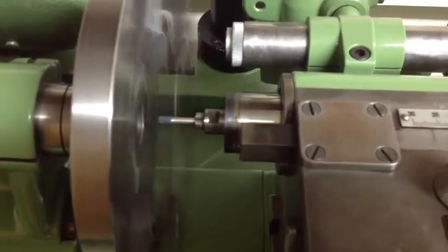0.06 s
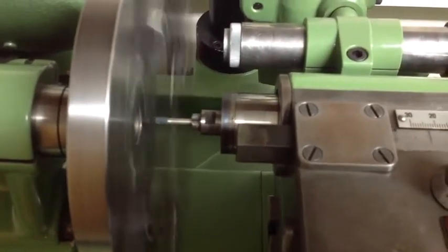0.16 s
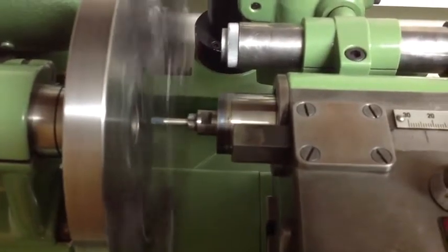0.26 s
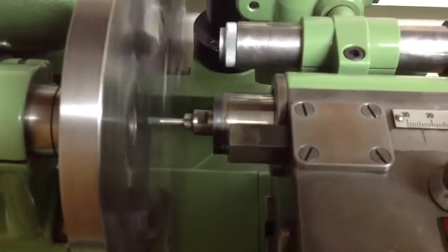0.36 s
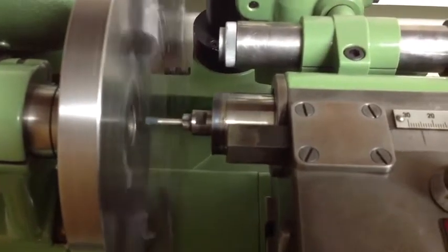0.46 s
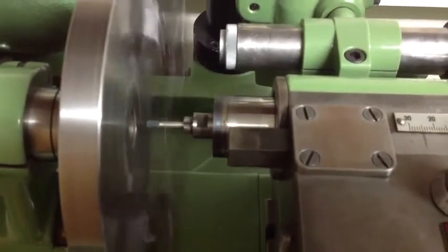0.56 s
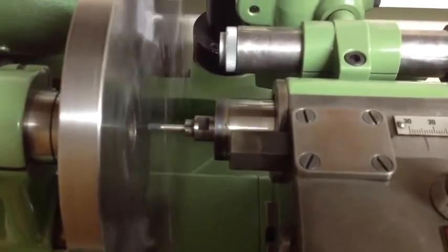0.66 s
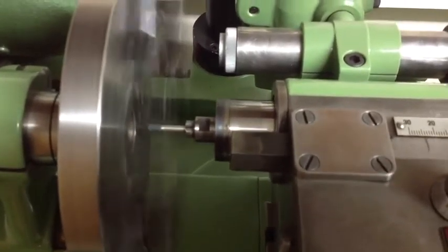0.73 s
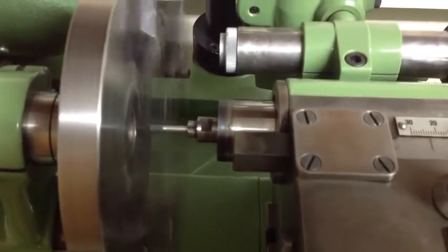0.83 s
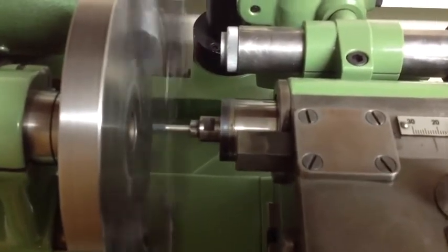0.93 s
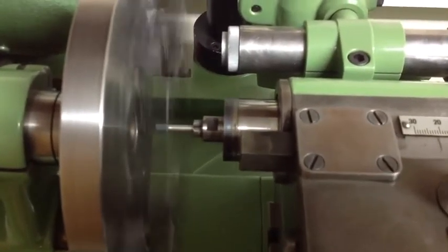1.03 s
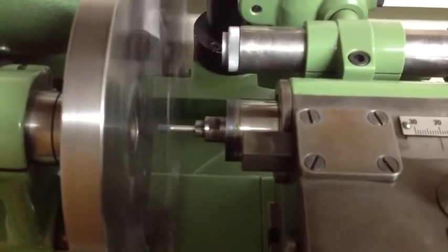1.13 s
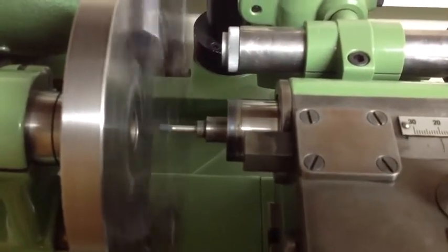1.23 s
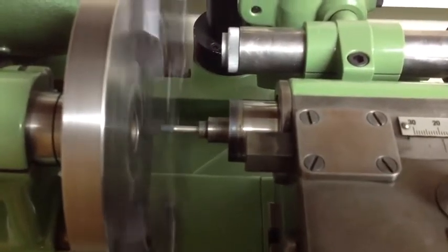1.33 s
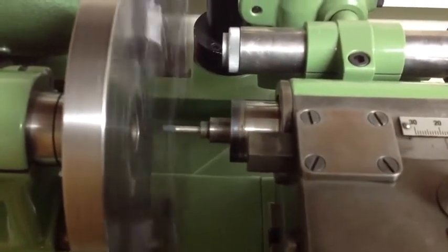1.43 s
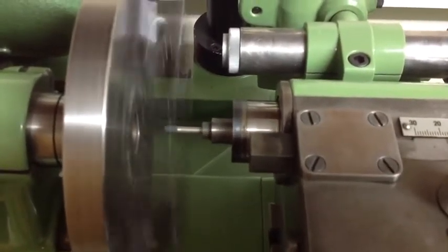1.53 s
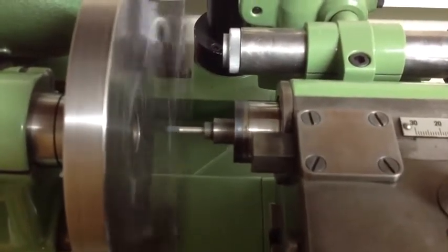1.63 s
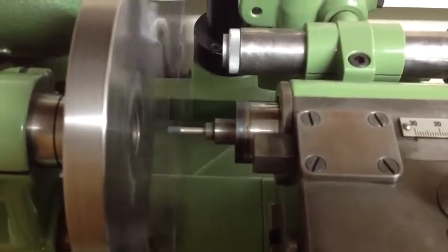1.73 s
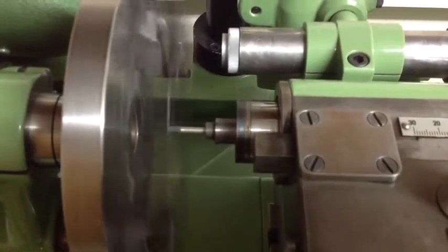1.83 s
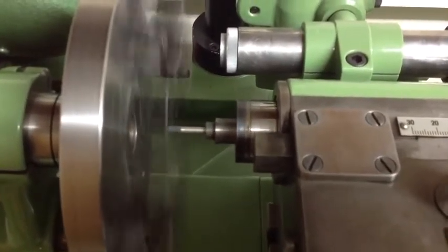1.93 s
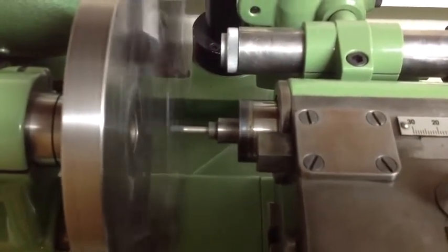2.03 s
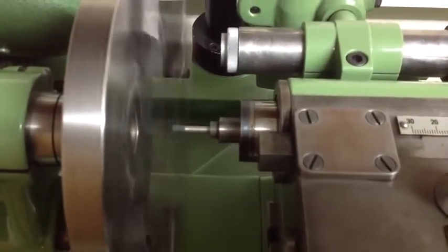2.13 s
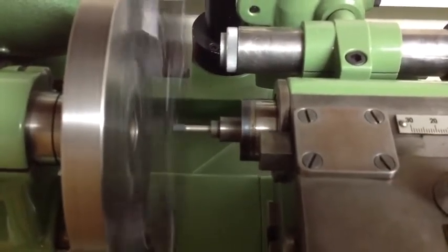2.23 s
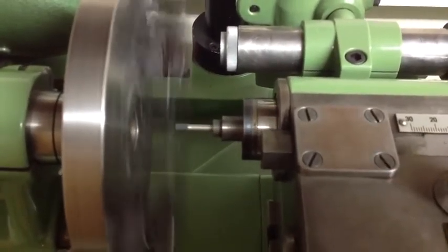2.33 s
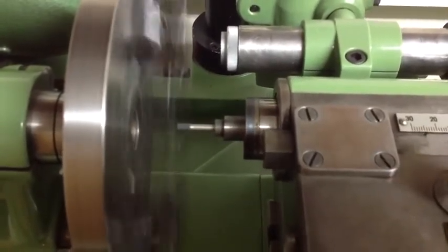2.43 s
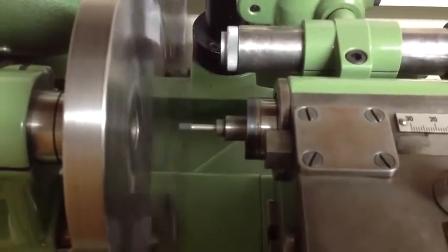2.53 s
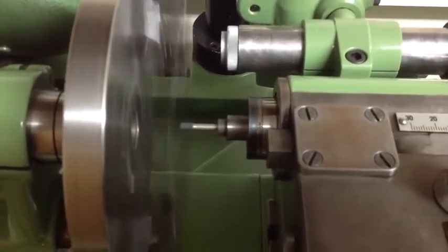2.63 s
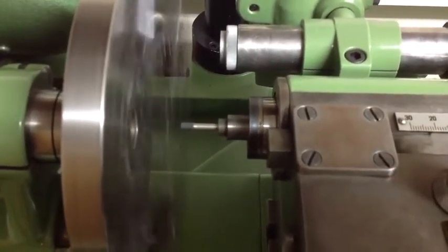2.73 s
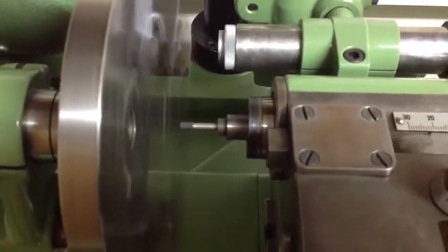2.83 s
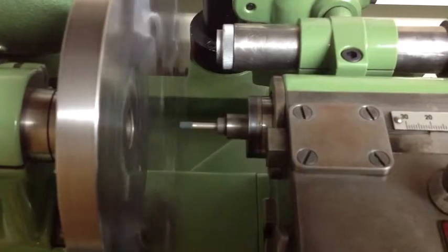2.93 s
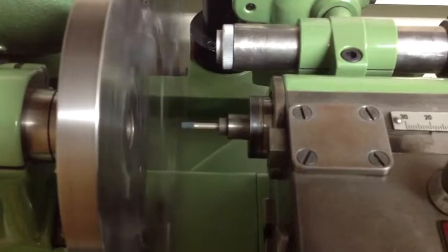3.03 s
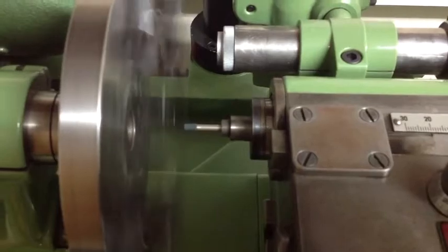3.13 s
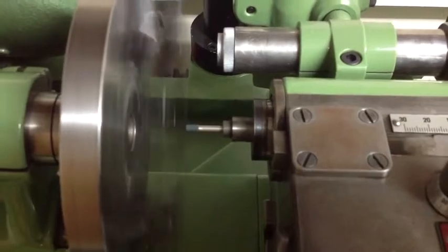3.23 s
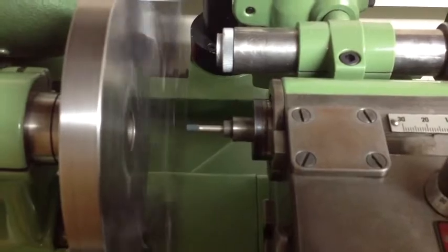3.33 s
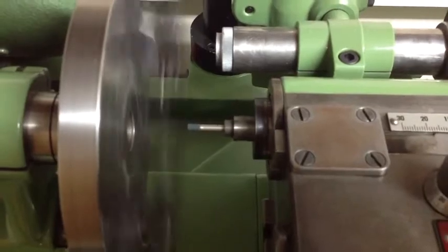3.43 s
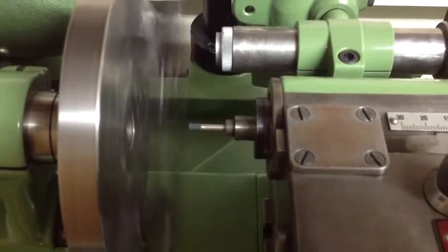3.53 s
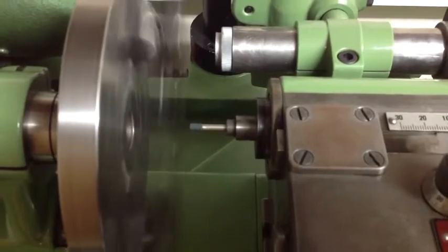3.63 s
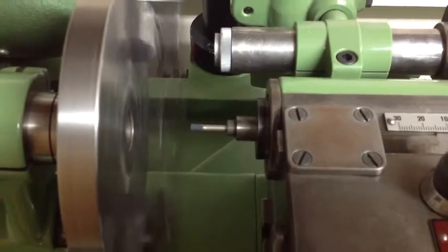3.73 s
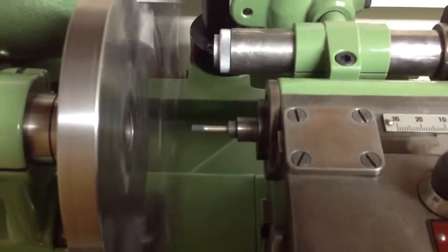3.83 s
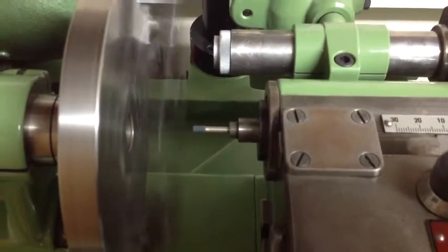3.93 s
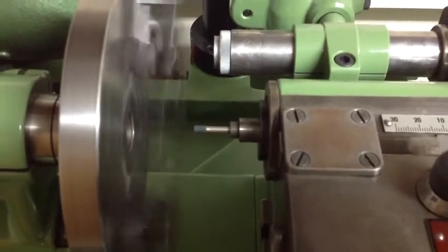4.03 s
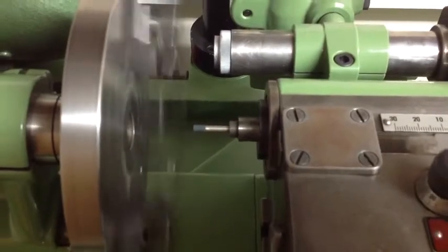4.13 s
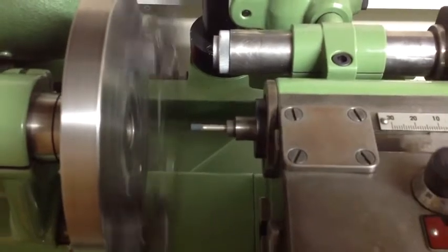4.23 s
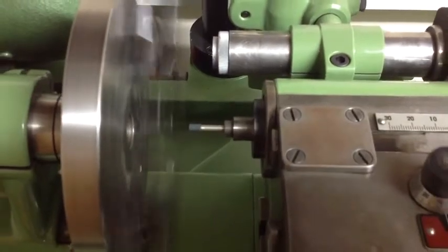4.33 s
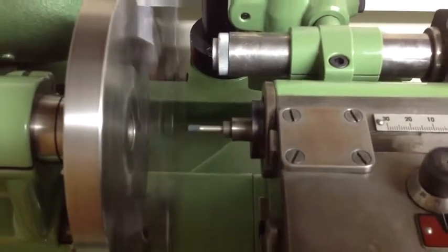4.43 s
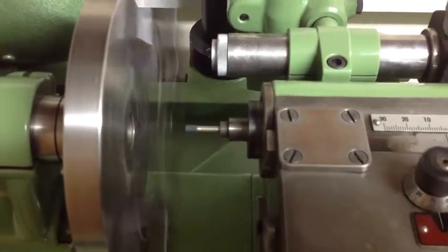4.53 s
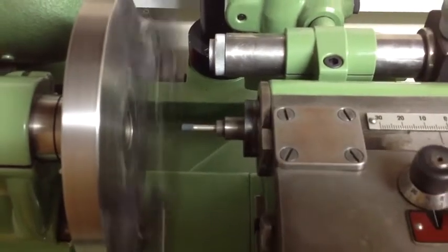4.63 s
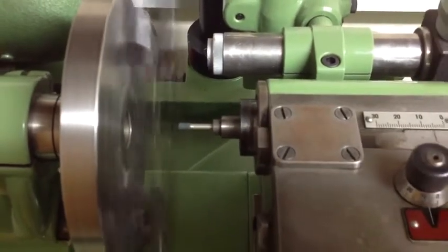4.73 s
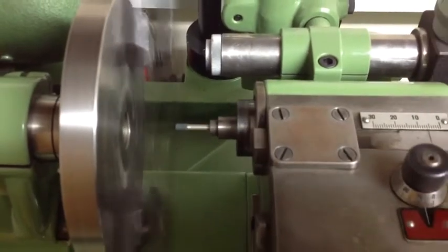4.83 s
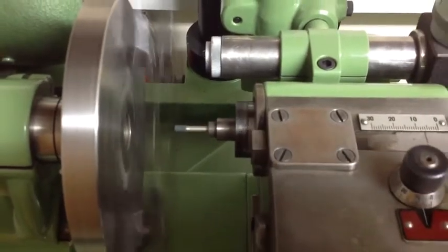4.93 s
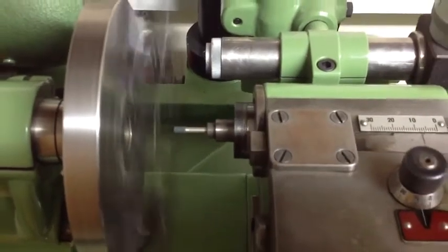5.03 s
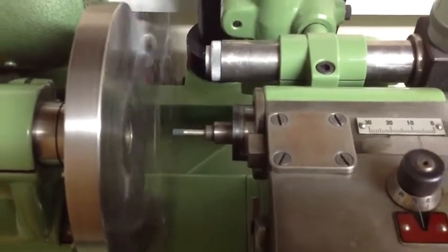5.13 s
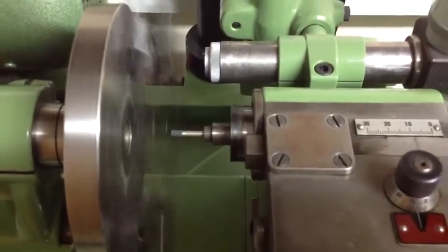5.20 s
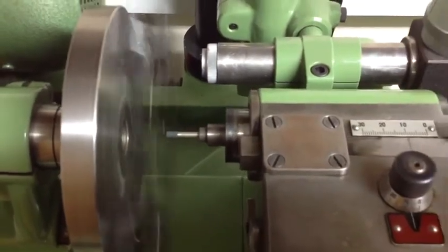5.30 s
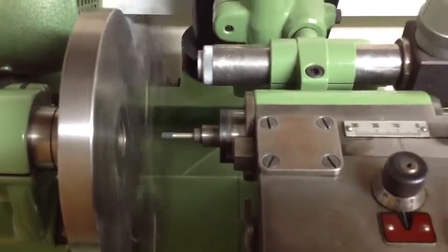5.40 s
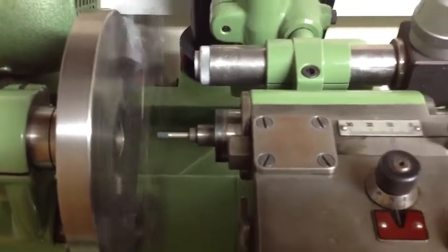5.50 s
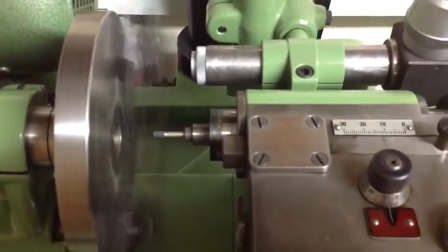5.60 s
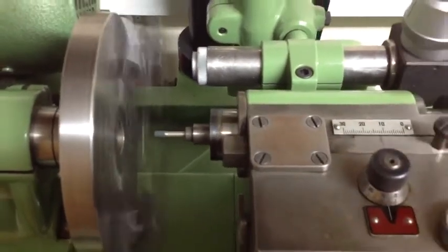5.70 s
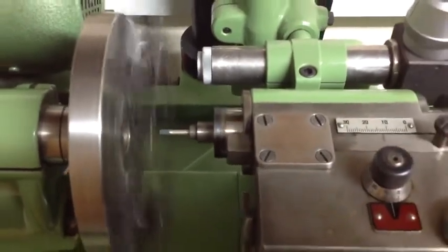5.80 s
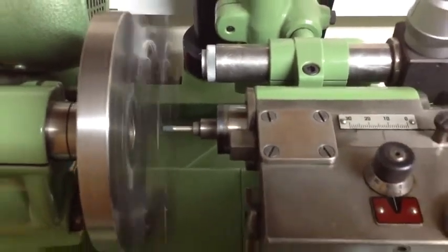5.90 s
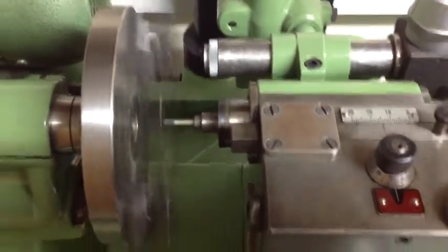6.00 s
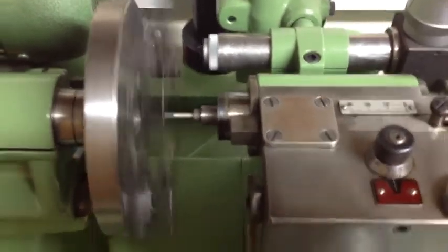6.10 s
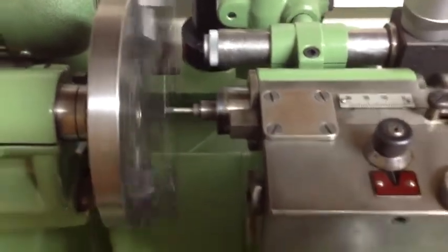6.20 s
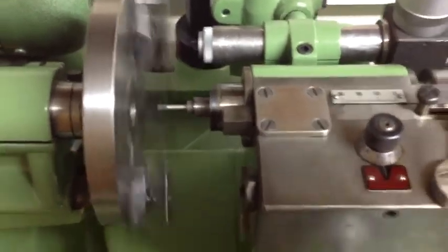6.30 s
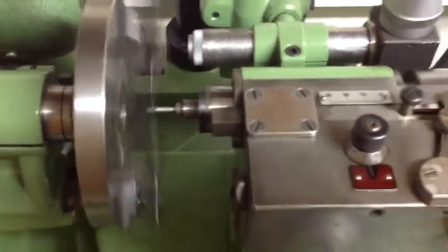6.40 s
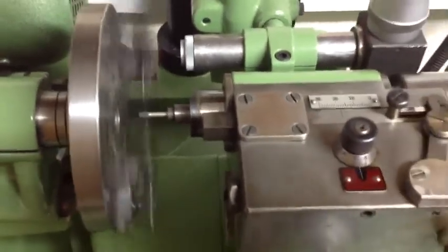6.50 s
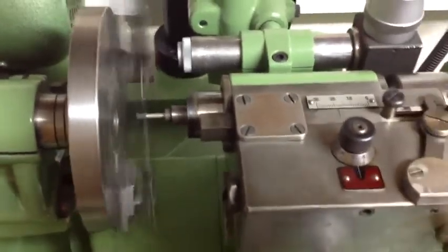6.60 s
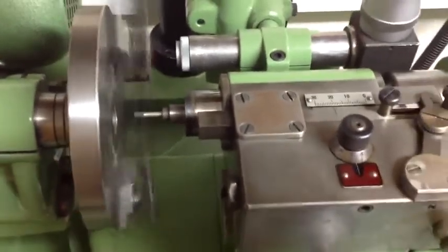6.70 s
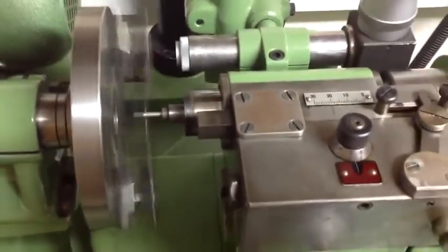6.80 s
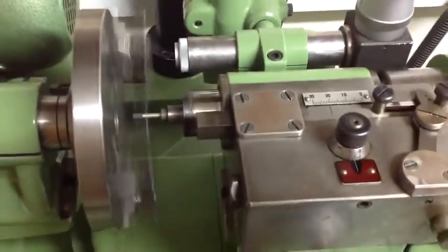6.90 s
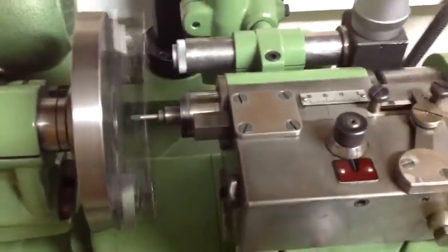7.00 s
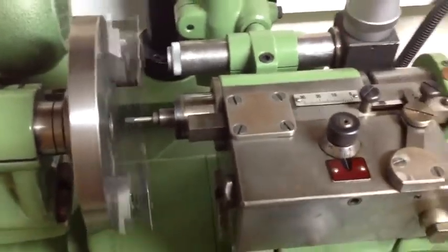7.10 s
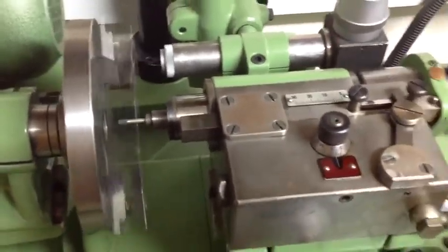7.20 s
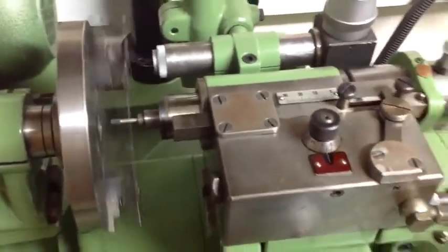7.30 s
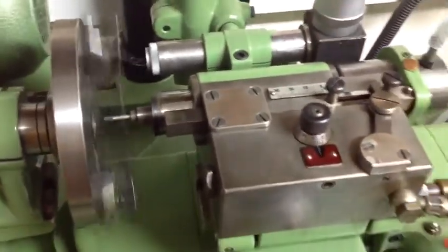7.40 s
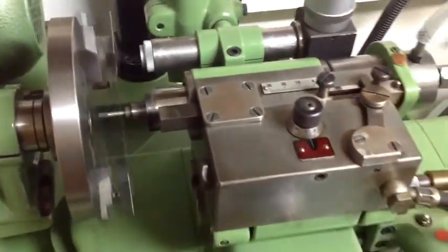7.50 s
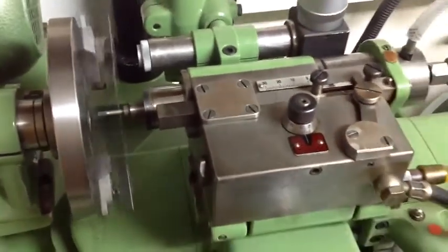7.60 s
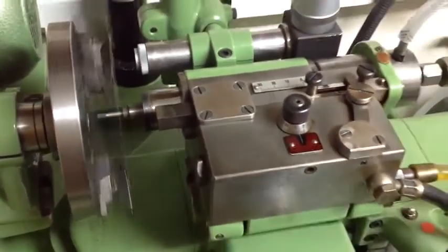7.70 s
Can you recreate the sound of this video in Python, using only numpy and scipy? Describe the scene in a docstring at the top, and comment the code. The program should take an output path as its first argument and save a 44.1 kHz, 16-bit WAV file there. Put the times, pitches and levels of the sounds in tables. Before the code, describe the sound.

A low workshop drive hum and a soft dull metal ring open the sound. Bright purge air soon hisses on, then a grinding spindle starts with a short rattle and fast rising whistles. The hiss briefly ducks as the shrill whine sweeps out of hearing; lower shaft and bearing tones keep climbing, ever more slowly. Close, mono, with a hard-limited top end.

```python
"""A humming workshop, close to a high-speed grinding spindle that starts up.
Purge air (shaped noise) hisses through the housing; then the motor runs up to about 1300 turns a second.
Shaft and bearing tones are sines locked to the speed; they swell as they climb through resonances.
The motor's slot whine sweeps above the recorder's band; up to 22 kHz it can still push the limiter,
which ducks all the sound, hiss included."""
import sys
import numpy as np
from scipy import signal
from scipy.fft import rfft, irfft
from scipy.io import wavfile
from scipy.ndimage import uniform_filter1d

SR = 44100
rng = np.random.default_rng(int(sys.argv[2]) if len(sys.argv) > 2 else 0)


def file_out(sig):
    """Save sig as 16-bit WAV at sys.argv[1]."""
    # one column per channel
    cols = np.atleast_2d(sig).T
    # limit, then scale
    lim = np.clip(cols, -1, 1)
    pcm = np.round(lim * 32767).astype(np.int16)
    wavfile.write(sys.argv[1], SR, pcm)


N = 341775
TIME_S = np.arange(N) / SR
BINS_HZ = np.fft.rfftfreq(N, 1 / SR)
TICKS_S = np.linspace(0, N / SR, 4096)  # slow control clock


def gain_of(db):
    """Decibels to amplitude."""
    return np.exp(np.asarray(db) * (np.log(10) / 20))


def evened(x):
    """Scales to an rms of one."""
    return x / np.sqrt(np.mean(x ** 2) + 1e-20)


def sampled(control):
    """Spreads a slow control over all samples."""
    return np.interp(TIME_S, TICKS_S, control)


def wander(rate_hz):
    """Smooth random control of unit rms; its changes roll off above rate_hz."""
    hz = np.fft.rfftfreq(len(TICKS_S), TICKS_S[1])
    smooth = rfft(rng.standard_normal(len(TICKS_S))) / (1 + (hz / rate_hz) ** 2)
    return evened(irfft(smooth))


def swell(middle_s, length_s):
    """A bell-shaped rise and fall around middle_s."""
    return 1 / np.sqrt(1 + (2 * (TICKS_S - middle_s) / length_s) ** 4)


def spectrum_db(points):
    """Joins (Hz, dB) points on a log-frequency axis."""
    hz, db = np.transpose(points)
    return np.interp(np.log(BINS_HZ + 1), np.log(hz + 1), db)


def noise(db):
    """Random noise with the given spectrum shape, at unit rms."""
    white = rfft(rng.standard_normal(N))
    return evened(irfft(white * gain_of(db), N))


def lift_db(resonances):
    """Lift of (Hz, width Hz, height dB) resonances at every frequency; their powers add."""
    power = 1
    for hz, width_hz, height_db in np.abs(resonances):
        offset = 2 * (BINS_HZ - hz) / width_hz
        power = power + (gain_of(height_db) ** 2 - 1) / (1 + offset ** 2) ** 2
    return 10 * np.log10(power)


# Housing resonances. Each row: centre in Hz, width in Hz, full height in dB.
HOUSING_MODES = [(854, 91, 17), (1150, 96, 11), (1840, 250, 13.5), (2530, 26, 2.5), (3090, 179, 13),
                 (4193, 37, 13.5), (4488, 215, 12.5), (5634, 190, 11), (6460, 60, 4.5), (6520, 100, 8.5),
                 (8056, 290, 9), (8490, 250, 5.5), (9190, 95, 8.5), (11480, 440, 5.5), (12130, 130, 10),
                 (14560, 200, 10)]


def housing_lift_db():
    """Lift by the housing's resonances at every frequency."""
    return lift_db(HOUSING_MODES)


# Straight climb until EASE_S, then an exponential approach to TOP_HZ.
MOTOR_ON_S, EASE_S, CLIMB_HZ_PER_S, TOP_HZ, SETTLE_S = 1.252, 2.361, 423.7, 1393.4, 2.429


def shaft_hz():
    """Turns a second: full torque first, then the shaft closes in on its top speed."""
    climb_hz = CLIMB_HZ_PER_S * (np.clip(TICKS_S, MOTOR_ON_S, EASE_S) - MOTOR_ON_S)
    shortfall = np.exp(-np.maximum(TICKS_S - EASE_S, 0) / SETTLE_S)
    return TOP_HZ - (TOP_HZ - climb_hz) * shortfall


def growth_db(db_per_doubling):
    """Vibration grows with speed; 0 dB at top speed."""
    return db_per_doubling * np.log2(shaft_hz() / TOP_HZ + 1e-6)


def passing_db(multiple, response_db):
    """Reads a response at the gliding pitch of one multiple of the shaft speed."""
    return np.interp(multiple * shaft_hz(), BINS_HZ, response_db)


def fading_db(depth_db, rate_hz):
    """A gliding tone fades in and out at random among the room's standing waves."""
    return 20 * np.log10(evened(gain_of(depth_db * wander(rate_hz))))


def tone(multiple, db, flutter_db, smear_rad, rate_hz, lowest_hz=100):
    """A sine locked to the shaft; its strength flutters and its phase wavers."""
    hz = multiple * shaft_hz()
    turns = (np.cumsum(hz) - hz / 2) * TICKS_S[1]
    angle = 2 * np.pi * turns + smear_rad * wander(rate_hz)
    radiated = (hz ** 2 / (hz ** 2 + lowest_hz ** 2)) ** 2  # a small body radiates low tones poorly
    in_band = np.clip((SR / 2 - hz) / 1000, 0, 1)  # no aliasing
    flutter = evened(gain_of(flutter_db * wander(rate_hz)))
    size = np.sqrt(2) * gain_of(db) * flutter * radiated * in_band
    return sampled(size) * np.sin(sampled(angle))


# Workshop noise spectrum. Each row: frequency in Hz, relative level in dB per Hz.
SHOP_SPECTRUM = [(30, -42), (75, -33), (110, -17), (170, -11.5), (240, -5.5), (350, -7.5), (550, -14),
                 (850, -6.5), (1150, -2.5), (1600, -6.5), (2300, -4), (2900, -12), (9000, -10), (15000, -9)]
# Ringing bands in the background. Each row: centre in Hz, width in Hz, height in dB.
SHOP_RINGING = [(634, 133, 12.5), (2200, 150, 5), (3420, 110, 15.5), (4170, 110, 8), (5290, 180, 14),
                (10300, 350, 4), (14400, 150, 9)]
# Hum of the work drive. Each row: frequency in Hz, mean rms level in dB.
DRIVE_HUM = [(121, -75.5), (219.5, -60), (438.7, -59), (543, -58), (561, -62.5), (658, -60)]


def workshop(noise_db=-39.5):
    """Steady machine noise, and the work drive's hum as sines wavering in level and phase."""
    noise_size = gain_of(noise_db + 1.7 * wander(2.5))
    out = sampled(noise_size) * noise(spectrum_db(SHOP_SPECTRUM) + lift_db(SHOP_RINGING))
    for hz, db in DRIVE_HUM:
        angle = 2 * np.pi * hz * TICKS_S + hz / 1100 * wander(7.5)
        size = np.sqrt(2) * gain_of(db + 2.32 * wander(3.3))
        out += sampled(size) * np.sin(sampled(angle))
    return out


# Dull ring. One row: start in seconds, peak rms level in dB, centre in Hz, rise and fall time in seconds.
DULL_RING = (0, -50, 1300, 0.3)


def dull_ring():
    """A soft, dull ring of metal: a narrow band of noise that rises and falls once."""
    start_s, peak_db, hz, rise_s = DULL_RING
    ring = noise(-20 * np.log10(1 + ((BINS_HZ - hz) / 250) ** 2))
    age = np.maximum(TICKS_S - start_s, 0) / rise_s
    return gain_of(peak_db) * ring * sampled(age * np.exp(1 - age))


def ripple_db(depth_db, spacing_hz):
    """Fine uneven colour of the hiss: random narrow peaks and gaps across the spectrum."""
    steps_hz = np.cumsum(np.full(1024, spacing_hz))
    return depth_db * np.interp(BINS_HZ, steps_hz, rng.standard_normal(len(steps_hz)))


# Air jet alone. Each row: frequency in Hz, relative level in dB per Hz.
JET_SPECTRUM = [(150, -43), (400, -25.5), (700, -19), (1100, -12.5), (1500, -21.5), (2100, -11.5),
                (2800, -7), (4300, -6), (5000, -3), (7200, -4.5), (8200, -0.5), (10200, -1), (11500, 0),
                (15500, 0.5)]
# Rush of the turning spindle. Each row: frequency in Hz, relative level in dB per Hz.
RUSH_SPECTRUM = [(150, -36), (550, -25), (820, -7), (1100, -9), (1520, -13), (1950, -7), (2650, -10.5),
                 (3300, -2.5), (4300, -1.5), (6400, 0.5), (7300, -1.5), (8300, 0.5), (11500, 2), (15500, 2)]
VALVE_S, PRESSURE_RISE_S, HISS_DB, SAG_AT_TOP_DB = 0.39, 0.49, -15, -2


def air(rush_share=0.67, rush_resonant=0.52, flicker_db=0.5, surge_db=1.6, surge_s=1.65, surge_length_s=0.68):
    """The jet rings the housing and surges as the shaft starts; with speed a smoother rush takes over."""
    lift, ripple = housing_lift_db(), ripple_db(depth_db=2.52, spacing_hz=44.65)
    jet = noise(spectrum_db(JET_SPECTRUM) + lift + ripple)
    rush = noise(spectrum_db(RUSH_SPECTRUM) + rush_resonant * lift + ripple)
    share = np.clip(rush_share * shaft_hz() / 1000, .01, .99)  # of the power
    pressure = 1 - np.exp(-np.maximum(TICKS_S - VALVE_S, 0) / PRESSURE_RISE_S)
    sag_db = SAG_AT_TOP_DB * shaft_hz() / TOP_HZ
    surge = surge_db * swell(surge_s, surge_length_s)
    size = pressure * gain_of(HISS_DB + sag_db + surge + flicker_db * wander(7.7))
    return sampled(size * np.sqrt(1 - share)) * jet + sampled(size * np.sqrt(share)) * rush


def rattle(peak_db=-34, middle_s=1.61, length_s=0.42, centre_hz=1050, width_hz=800, resonant=1.16):
    """While the shaft is still slow, the rolling balls rattle the housing's low resonances."""
    band_db = -20 * np.log10(1 + ((BINS_HZ - centre_hz) / width_hz) ** 2)
    low_cut_db = -10 * np.log10(1 + (600 / (BINS_HZ + 1)) ** 6)
    size = gain_of(peak_db) * swell(middle_s, length_s)
    return sampled(size) * noise(band_db + low_cut_db + resonant * housing_lift_db())


# Early housing rings. Each row: middle in seconds, pitch in Hz, level in dB, length in seconds.
EARLY_RINGS = [(1.54, 2600, -35, 0.092), (1.654, 2570, -29.5, 0.11), (1.723, 4060, -27.5, 0.21),
               (1.762, 2690, -33, 0.08), (1.87, 4130, -21.5, 0.055), (2.052, 4170, -22, 0.058)]


def housing_swells(width_hz=45):
    """The crowd of low-speed bearing tones rings the housing: rough, narrow swells."""
    out = np.zeros(N)
    for middle_s, hz, peak_db, length_s in EARLY_RINGS:
        roughness = evened(gain_of(3.4 * wander(width_hz)))
        size = np.sqrt(2) * gain_of(peak_db) * swell(middle_s, length_s) * roughness
        angle = 2 * np.pi * hz * TICKS_S + 2 * wander(width_hz)
        out += sampled(size) * np.sin(sampled(angle))
    return out


# Radiation of bearing tones by the spindle body. Each row: frequency in Hz, response in dB.
BODY_RADIATION = [(1500, -40), (2500, -11), (3600, -0.5), (4300, 0), (6400, 6), (7400, -21), (9000, -13),
                  (11000, 4), (12300, 3.5), (15000, -7)]
# Sharp modes of the spindle nose. Each row: centre in Hz, width in Hz, full height in dB.
NOSE_MODES = [(2904.8, 100, 13), (4112, 85, 11), (4263, 110, 6.5), (4442, 54, 9), (6260, 180, 9.5),
              (6434, 160, 6.5), (11160, 246, 5), (11860, 380, 10), (14850, 250, 6)]


def body_db(resonant, sharp):
    """How strongly the spindle body answers the bearings at every frequency."""
    return spectrum_db(BODY_RADIATION) + resonant * housing_lift_db() + sharp * lift_db(NOSE_MODES)


# Weaker shaft and bearing tones. Each row: multiple of the shaft speed, relative level in dB.
WEAK_TONES = [(2.52, -34), (2.76, -38.5), (3, -41), (4, -38), (5, -45.5), (5.48, -52.5), (5.88, -45.5),
              (6, -37), (6.58, -50.5), (7, -36), (7.98, -33.5), (9, -33.5), (9.16, -59), (9.72, -44),
              (10, -34.5), (11, -52), (11.27, -37), (12.08, -33), (12.47, -43), (12.8, -31), (13.02, -38.5),
              (13.66, -45.5), (14, -43), (15.19, -39.5), (15.9, -33), (16.95, -34), (21, -33)]


def overtones(trim_db=-2, full_speed_hz=950, growth_db_per_decade=17):
    """Weak tones grow with speed, swell at resonances, and fade in and out as they glide."""
    body, out = body_db(resonant=0.39, sharp=0.53), np.zeros(N)
    growth = growth_db_per_decade * np.log10(np.clip(shaft_hz() / full_speed_hz, .001, 1))
    for multiple, db in WEAK_TONES:
        fading = fading_db(depth_db=2.5, rate_hz=9)
        size_db = db + trim_db + growth + passing_db(multiple, body) + fading
        out += tone(multiple, size_db, flutter_db=1.8, smear_rad=.33, rate_hz=26, lowest_hz=600)
    return out


# Multiples of the shaft speed; levels at top speed, before the body's response.
OUTER_ORDER, INNER_ORDER, CAGE_ORDER = 3.48, 5.045, .36
OUTER_DB, INNER_DB, CAGE_DB = -35, -41, -47
RACE_GROWTH_DB_PER_DOUBLING, CAGE_GROWTH_DB_PER_DOUBLING = 3.5, 45


def bearings():
    """Rougher tones of the balls rolling over the outer and inner rings, and the whirr of their cage."""
    body, growth = body_db(resonant=0.24, sharp=1.23), growth_db(RACE_GROWTH_DB_PER_DOUBLING)
    outer_db = OUTER_DB + growth + passing_db(OUTER_ORDER, body) + fading_db(depth_db=2.5, rate_hz=5.6)
    outer = tone(OUTER_ORDER, outer_db, flutter_db=3.5, smear_rad=0.24, rate_hz=21)
    inner_db = INNER_DB + growth + passing_db(INNER_ORDER, body)
    inner = tone(INNER_ORDER, inner_db, flutter_db=1.5, smear_rad=0.2, rate_hz=17)
    cage_db = CAGE_DB + growth_db(CAGE_GROWTH_DB_PER_DOUBLING)  # no body response
    cage = tone(CAGE_ORDER, cage_db, flutter_db=4.5, smear_rad=0.53, rate_hz=14.0)
    return outer + inner + cage


def level_db(rows, fade_db_per_s=150):
    """Joins (s, dB) rows by straight lines; fades away before the first and after the last."""
    outside_s = np.maximum(rows[0][0] - TICKS_S, 0) + np.maximum(TICKS_S - rows[-1][0], 0)
    return np.interp(TICKS_S, *np.transpose(rows)) - fade_db_per_s * outside_s


# Once-a-turn tone of the unbalanced shaft. Each row: time in seconds, level in dB before radiation loss.
ONCE_A_TURN_LEVEL = [(2.3, -61), (2.64, -51), (3.56, -53), (3.6, -42), (4.58, -47), (4.62, -39),
                     (5.12, -28.5), (5.44, -38), (5.98, -39.5), (6.02, -50), (6.2, -28), (6.44, -38),
                     (6.48, -30), (7.06, -31.5), (7.14, -53), (7.2, -34), (7.48, -23), (7.74, -30.5)]
# Twice-a-turn tone. Each row: time in seconds, level in dB before radiation loss.
TWICE_A_TURN_LEVEL = [(2.3, -48), (2.44, -58), (2.74, -37), (2.96, -47), (3.14, -38.5), (3.46, -44),
                      (3.58, -28), (4.2, -35.5), (4.42, -30), (4.54, -41), (4.8, -25), (5.2, -35),
                      (5.74, -35), (6.58, -28.5), (6.66, -43.5), (6.98, -29), (7.28, -36.5), (7.74, -29.5)]


def shaft_whine():
    """Clean tones of the shaft, once and twice a turn; imbalance drives the first."""
    once_db, twice_db = level_db(ONCE_A_TURN_LEVEL), level_db(TWICE_A_TURN_LEVEL)
    once = tone(1, once_db, flutter_db=2.0, smear_rad=.05, rate_hz=14, lowest_hz=208)
    twice = tone(2, twice_db, flutter_db=4.0, smear_rad=.07, rate_hz=6.1, lowest_hz=350)
    return once + twice


# Slot whine, resonances apart. Each row: pitch in Hz, level in dB.
SLOT_WHINE_LEVEL = [(500, -58), (900, -44), (2000, -37), (3200, -44), (4700, -37), (6000, -22.5),
                    (8500, -18), (10000, -25.5), (13000, -18), (16000, -27.5), (21000, -20)]
# Stator modes, the upper ones above the recorder's band. Each row: centre in Hz, width in Hz, height in dB.
STATOR_MODES = [(6700, 174, 8), (8450, 630, 7), (9280, 430, 12), (13820, 220, 13.5), (14176, 220, 10),
                (14800, 140, 10), (17180, 400, 17), (18990, 330, 12), (19640, 660, 14.5),
                (20270, 510, 12.5)]
SLOT_ORDER = 21.98  # multiple of the shaft speed


def slot_whine(resonant=0.64):
    """The rotor's slots sing, flaring up at each mode of the housing and stator."""
    response = spectrum_db(SLOT_WHINE_LEVEL) + resonant * housing_lift_db() + lift_db(STATOR_MODES)
    size_db = passing_db(SLOT_ORDER, response)
    return tone(SLOT_ORDER, size_db, flutter_db=2.8, smear_rad=.55, rate_hz=70, lowest_hz=120)


def scene():
    """Everything reaches one microphone, the same in both channels."""
    spindle = shaft_whine() + bearings() + slot_whine() + overtones()
    early = rattle() + housing_swells()
    mono = spindle + early + air() + dull_ring() + workshop()
    return np.array([mono, mono])


LIMIT_DB, LIMIT_WINDOW_S, RECOVER_DB_PER_S, EDGE_HZ = -10, 0.0013, 127, 15280


def record(dry):
    """A fast limiter that also reacts to sound above the band, then the recorder's steep band limit."""
    power = uniform_filter1d((dry ** 2).mean(0), round(LIMIT_WINDOW_S * SR))
    over_db = np.maximum(10 * np.log10(abs(power) + 1e-12) - LIMIT_DB, 0)
    recovery_db = RECOVER_DB_PER_S * TIME_S
    duck_db = np.maximum.accumulate(over_db + recovery_db) - recovery_db  # instant attack, linear recovery
    limited = dry / gain_of(duck_db)
    low_pass = signal.firwin(601, EDGE_HZ, window=("kaiser", 9), fs=SR)
    return signal.oaconvolve(limited, low_pass[None], "same")


dry = scene()
out = record(dry)
file_out(out)
```